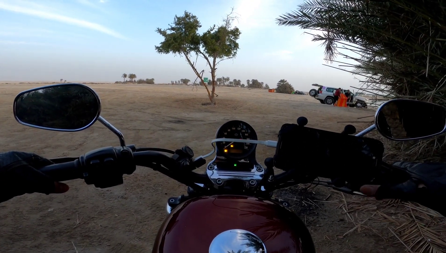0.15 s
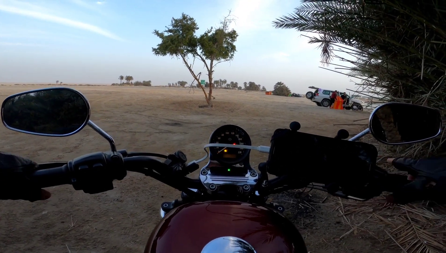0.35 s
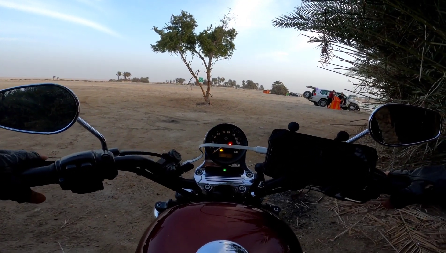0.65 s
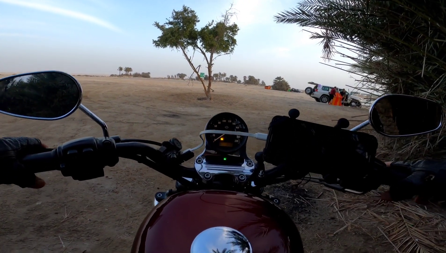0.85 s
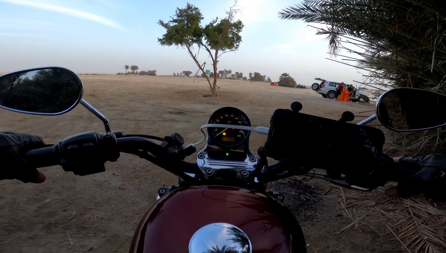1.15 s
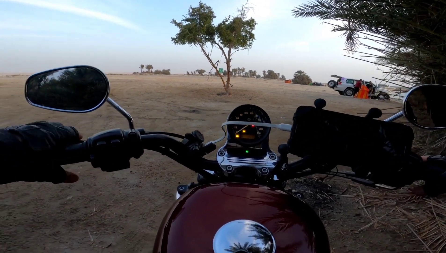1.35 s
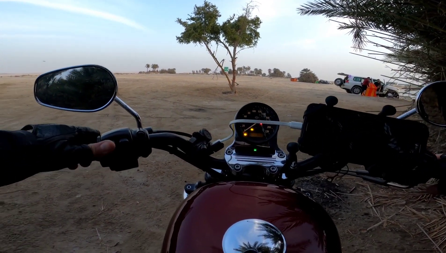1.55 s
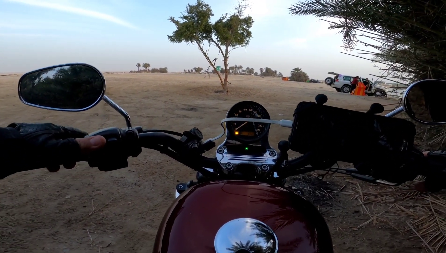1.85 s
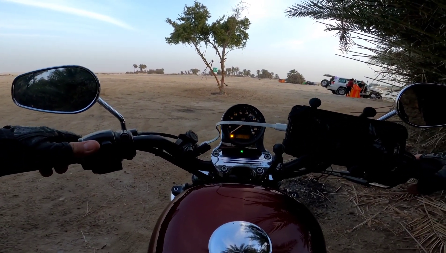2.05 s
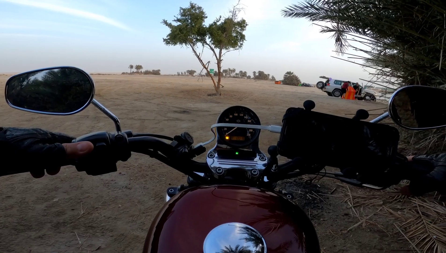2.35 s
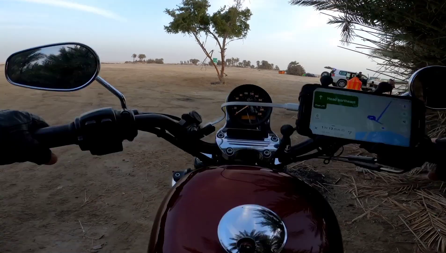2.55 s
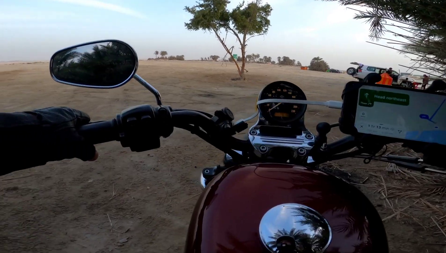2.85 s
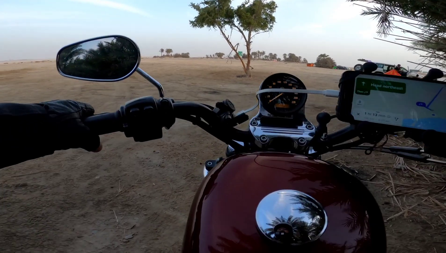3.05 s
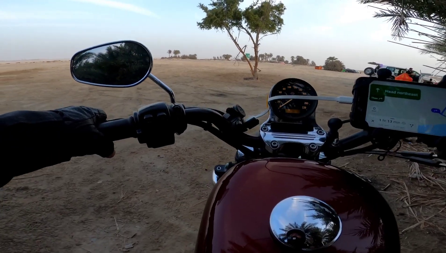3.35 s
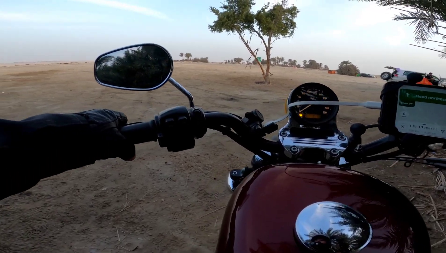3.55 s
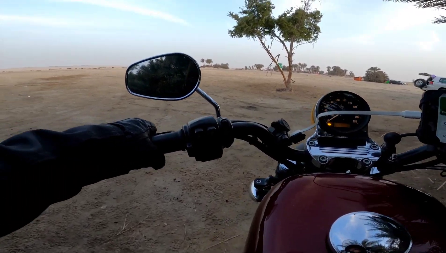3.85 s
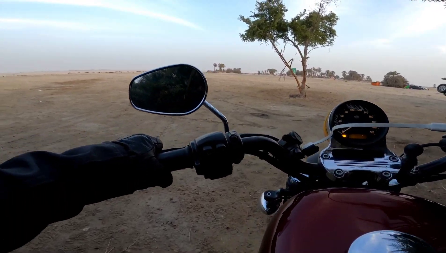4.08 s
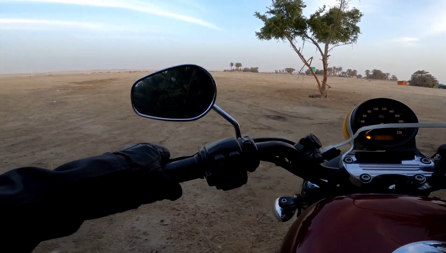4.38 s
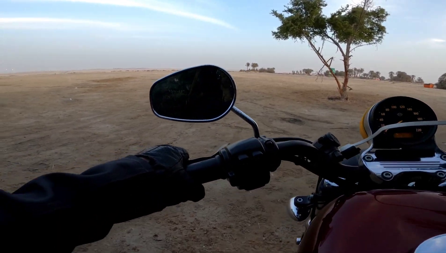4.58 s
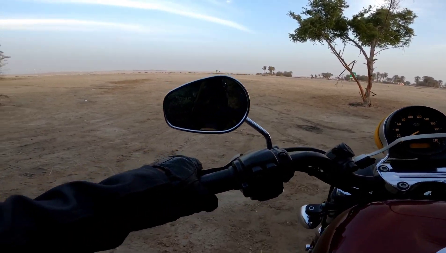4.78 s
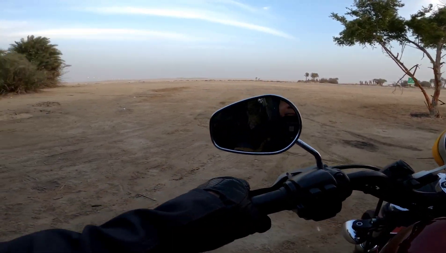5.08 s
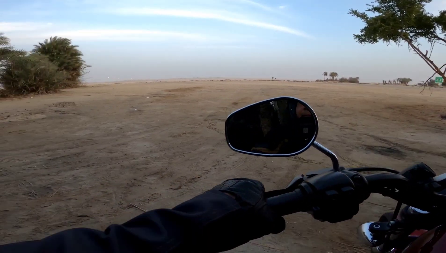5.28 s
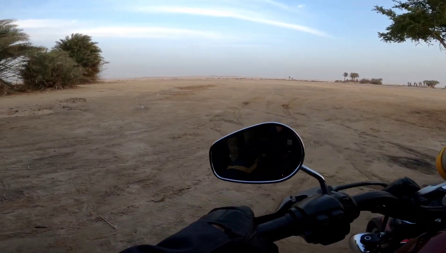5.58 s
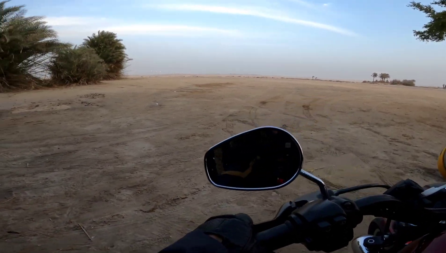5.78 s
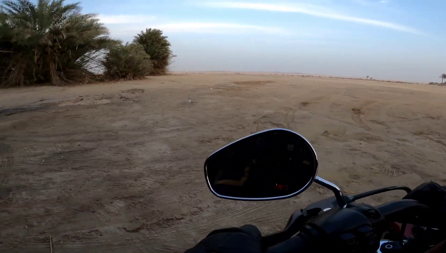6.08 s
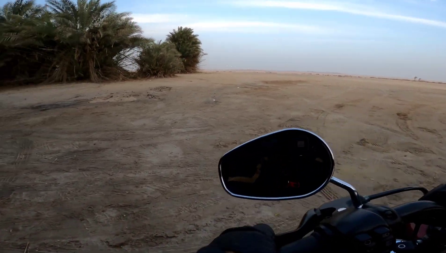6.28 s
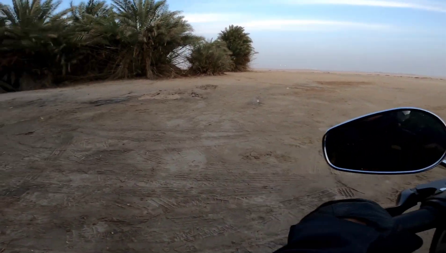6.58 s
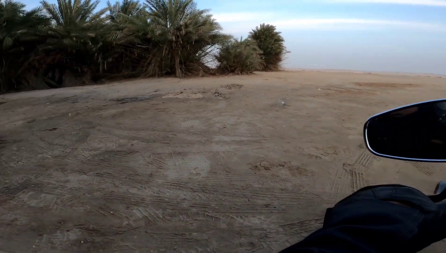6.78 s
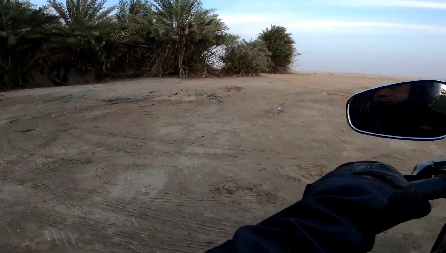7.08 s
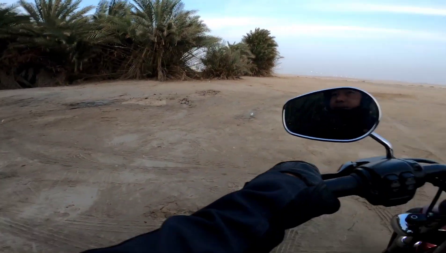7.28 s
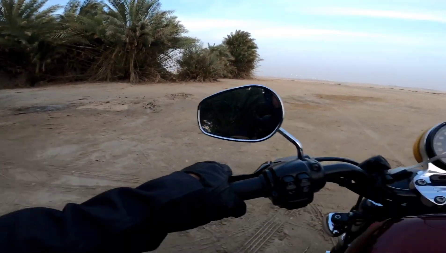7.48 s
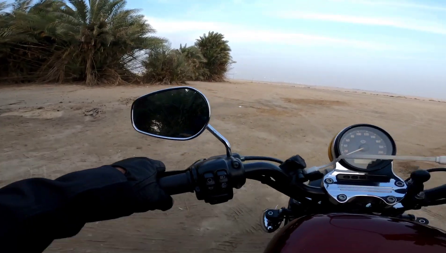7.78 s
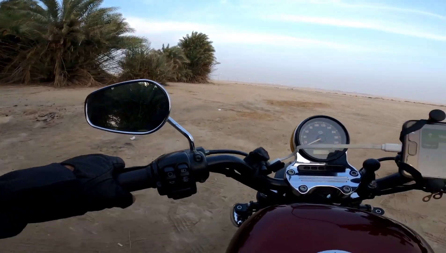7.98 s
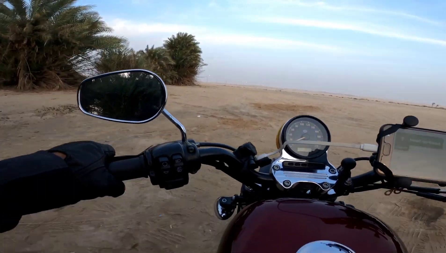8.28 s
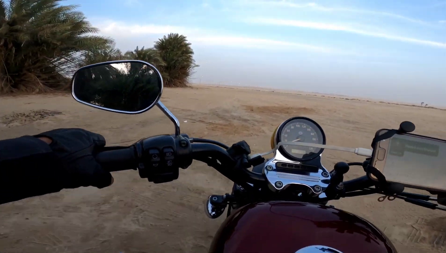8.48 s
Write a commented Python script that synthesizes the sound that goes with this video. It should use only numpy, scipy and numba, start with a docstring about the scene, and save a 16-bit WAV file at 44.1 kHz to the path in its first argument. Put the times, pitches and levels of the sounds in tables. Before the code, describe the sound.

Close, dry and bass-heavy: a big motorcycle engine clanks as it starts, speeds up within half a second and settles into a lumpy fast idle. After a momentary near-silence it runs on restlessly, rising and falling and missing firings. Exhaust thump and bark dominate; intake gulps, chain whirr, bright valve ticking and light casing knocks sit around them. The rider-mounted microphone turns, shifting the metallic colour, and gently rounds the loudest peaks.

```python
"""A big V-twin motorcycle, heard from the saddle: its revs climb from a slow start, with a clank, to a fast idle.
After a brief drop in level it runs on at uneven revs that rise and fall, now and then missing a few beats.
Unevenly spaced firings thump through the silencer and bark in the pipe; the intake gulps and the airbox rings.
The chain whirrs over a rumbling crankcase, valves tick, cooling fins ring and the casing knocks.
One crankshaft drives the periodic parts; engine parts grow louder with the revs and the bark rises as it pulls."""
import sys
import numpy as np
from scipy import signal
from scipy.fft import rfft, irfft
from scipy.io import wavfile
from scipy.ndimage import uniform_filter1d
from numba import njit

SR = 44100
rng = np.random.default_rng(int(sys.argv[2]) if len(sys.argv) > 2 else 0)


def int16_out(signal):
    """Quantize to a 16-bit WAV file."""
    q = np.round(np.clip(np.atleast_2d(signal).T, -1, 1) * 32767)
    wavfile.write(sys.argv[1], SR, q.astype(np.int16))


N = 381024
TIME = np.arange(N) / SR

# where in the two-turn cycle each exhaust valve opens [cycles]
FRONT, REAR = .072, .519
# the level dips here [s] and the engine resumes this much further on in its cycle [cycles]
BREAK_S, BREAK_CYCLES = 2.67, .41
# cooling fins and rocker covers: (centre [Hz], width [Hz], level [dB])
FIN_MODES = [(1936, 20, -10), (2461, 22, 0), (2545, 26, -4), (2650, 42, 2), (2840, 60, -1), (3030, 90, -7),
             (3194, 60, -3), (3400, 120, -12), (3896, 65, -14), (4160, 70, -15)]
# valve train ring: (centre [Hz], width [Hz], level [dB])
VALVE_MODES = [(4610, 210, 1.5), (5280, 970, -5), (7040, 55, 2.5), (7490, 144, 1), (8130, 490, -1),
               (9890, 880, -6.5)]


def undb(db):
    """Decibels to gain."""
    return 10 ** (np.asarray(db) / 20)


def unit(x):
    """Scale to rms 1."""
    return x / np.sqrt(np.mean(x ** 2))


def noise():
    """White noise."""
    return rng.standard_normal(N)


def wander(rate):
    """Random drift in straight lines, rms 1, changing at up to about rate Hz."""
    steps = TIME * 2.2 * rate
    values = rng.standard_normal(16384)
    return unit(np.interp(steps, np.arange(len(values)), values))


def curve(points):
    """Join (time [s], value) points by straight lines."""
    return np.interp(TIME, *np.transpose(points))


def burst(s, db, decay):
    """Level of a contact that starts at once and dies away."""
    return undb(db) * (TIME >= s) * np.exp(-np.abs(TIME - s) / decay)


def band(x, hz, width):
    """One resonance, gain 1 at its centre."""
    return signal.lfilter(*signal.iirpeak(hz, hz / width, fs=SR), x)


def ring(x, modes):
    """A body's resonances; neighbours swing in opposite senses."""
    return sum((-1) ** k * undb(db) * band(x, hz, width) for k, (hz, width, db) in enumerate(modes))


@njit
def sweep(x, hz, width):
    """A resonance whose centre and width [Hz] move, as a state-variable filter."""
    y, b, l = np.empty(len(x)), 0., 0.
    for i in range(len(x)):
        g, k = np.tan(np.pi * hz[i] / SR), width[i] / hz[i]
        v = (b + g * (x[i] + 1e-18 - l)) / (1 + g * (g + k))
        b, l, y[i] = 2 * v - b, l + 2 * g * v, k * v
    return y


def cut(x, hz, kind, order=2):
    """Low-pass or high-pass."""
    return signal.sosfilt(signal.butter(order, hz, kind, fs=SR, output="sos"), x)


def colour(x, points):
    """Shape a spectrum by (frequency [Hz], level [dB]) points."""
    hz, db = np.transpose(points)
    bins = np.maximum(np.fft.rfftfreq(N, 1 / SR), 1)
    return irfft(rfft(x) * undb(np.interp(np.log(bins), np.log(hz), db)), N)


def strokes(cycle, place):
    """Sample numbers at which the engine passes a place in its cycle."""
    return np.flatnonzero(np.diff(np.floor(cycle - place)) > 0)


def stroke_pulses(cycle, lag_cycles, height):
    """One equal pulse per cylinder and cycle, a lag after its exhaust valve opens."""
    pulses = np.zeros(N)
    for place in (FRONT, REAR):
        pulses[strokes(cycle, place + lag_cycles)] = height
    return pulses


def loudness(rpm, idle_db, moving_db, revs_db, pull_db):
    """Gain of an engine part: it follows the revs, and shifts again while the engine gathers speed."""
    # the stated levels hold at cruise; below the low revs they stop falling
    cruise_rpm, low_rpm, full_pull_rpm_per_s = 1830, 1450, 4500
    doublings = np.log2(np.maximum(rpm, low_rpm) / cruise_rpm)
    pull = np.clip(np.gradient(rpm) * SR / full_pull_rpm_per_s, 0, 1)
    pull = uniform_filter1d(pull, size=SR // 8)
    base_db = np.where(TIME < BREAK_S, idle_db, moving_db)
    return undb(base_db + revs_db * doublings + pull_db * pull)


def firings(cycle, rear_db, scatter_db, suck):
    """One pressure pulse per exhaust stroke; in runs of faltering strokes a small backward pulse comes instead."""
    # runs of faltering strokes, each giving a small backward pulse: (start [s], strokes affected [count],
    # spacing [strokes])
    faltering_runs = [(.43, 5, 4), (1.06, 4, 4), (2.01, 4, 4), (4.29, 3, 1), (4.64, 3, 1), (4.9, 3, 1),
                      (5.22, 3, 1), (5.38, 2, 1), (5.57, 1, 1), (6.36, 1, 1), (6.57, 2, 1), (6.96, 1, 1),
                      (7.98, 2, 1), (8.11, 2, 1), (8.47, 1, 1)]
    pulses = np.zeros(N)
    for place, db in ((FRONT, 0), (REAR, rear_db)):
        at = strokes(cycle, place)
        pulses[at] = undb(db + scatter_db * rng.standard_normal(len(at)))
    at = np.flatnonzero(pulses)
    for start, missed, every in faltering_runs:
        first = np.abs(TIME[at] - start).argmin()
        pulses[at[first::every][:missed]] = -suck
    return pulses


def pumping(cycle, lag_cycles, depth):
    """As each piston turns down again it draws gas back, so the rumble carries through a misfire."""
    return stroke_pulses(cycle, lag_cycles, -depth)


def thump(pulses, pace):
    """The silencer rounds each pulse into push, pull and push; hotter gas at higher revs raises its notes."""
    # silencer resonances at mean revs: (centre [Hz], width [Hz], level [dB])
    silencer = [(65.5, 34, -1.5), (137.6, 64.4, 2), (159.8, 45.6, 1), (256.7, 32, -15)]
    puff = cut(pulses, 217, "low")
    heat = pace ** .25
    total = np.zeros(N)
    for k, (hz, width, db) in enumerate(silencer):
        total += (-1) ** k * undb(db) * sweep(puff, hz * heat, width * heat)
    return unit(total / heat)


def bark(pulses, echo_s, echo_db, rush_db):
    """The sharp front of each pulse rings the pipe and returns once from its end; turbulence follows."""
    # higher pipe resonances: (centre [Hz], width [Hz], level [dB])
    pipe_modes = [(219.8, 42, 5), (266.6, 44, 5.5), (379, 22.4, -4), (463, 32, -12), (664, 27, -12.5)]
    echo = np.interp(TIME - echo_s, TIME, pulses)
    fronts = pulses - undb(echo_db) * echo
    # gas rush dies away over 18 ms
    flow = signal.lfilter([1], [1, -np.exp(-1 / (0.018 * SR))], np.abs(pulses))
    rush = flow * noise()
    pipe = ring(unit(fronts) + undb(rush_db) * unit(rush), pipe_modes)
    return unit(cut(cut(pipe, 144, "high", order=3), 700, "low"))


def throttle_blips():
    """Short twists of the throttle raise the bark and the airbox."""
    # twists of the throttle: (time [s], level [dB])
    blips = [(1.12, 3.5), (3.57, 3.5), (8.58, 2)]
    blip_s = 0.11
    return undb(sum(db * np.exp(-((TIME - s) / blip_s) ** 2) for s, db in blips))


def intake(cycle, lag_cycles, length_s):
    """Each piston gulps air a little after its exhaust stroke, whether it fired or not."""
    gulps = stroke_pulses(cycle, lag_cycles, 1)
    bell_time = np.arange(-SR // 20, SR // 20) / SR
    bell = np.exp(-.5 * (bell_time / length_s) ** 2)
    return unit(cut(signal.fftconvolve(gulps, bell, "same"), 30, "high"))


def airbox(cycle, lag_cycles):
    """Each inlet valve snaps open after its exhaust stroke and rings the airbox."""
    # airbox resonances: (centre [Hz], width [Hz], level [dB])
    airbox_modes = [(295, 104, 0), (391, 41, 1.5)]
    snaps = stroke_pulses(cycle, lag_cycles, 1)
    return unit(cut(cut(ring(snaps, airbox_modes), 185, "high", order=3), 640, "low"))


def chain(cycle, rpm, spread, whirr_db, case_hz):
    """Links meet the sprocket 68 times a cycle; uneven links give sidebands, slack smears them into a whirr."""
    links = 68
    orders = np.arange(28, 90)
    place = np.linspace(0, 1, 2048)
    # one cycle of mesh sound, its orders fading either side of the link rate
    waves = np.cos(2 * np.pi * (place[:, None] * orders + rng.random(len(orders))))
    lap = waves @ (1 / np.hypot(1, (orders - links) / spread))
    mesh = np.interp((cycle + .001 * wander(30)) % 1, place, lap)
    hz = links * rpm / 120
    whirr = sweep(noise() * undb(3.0 * wander(100)), hz, 0.94 * hz)
    # the chain case lets little treble out
    return unit(cut(unit(mesh) + undb(whirr_db) * unit(whirr), case_hz, "low", order=8))


def crankcase():
    """Gears and bearings rumble unevenly through the case."""
    # crankcase rumble and gear noise: (frequency [Hz], spectral level [dB])
    case_colour = [(300, -3), (480, 3.5), (560, -6), (660, 1.5), (770, -9), (870, 0), (1050, 0.5),
                   (1230, -5), (1400, -19.5), (1600, -20), (2200, -21.5), (3300, -25), (4500, -34),
                   (6300, -37), (11000, -53.5)]
    rumble = colour(noise() * undb(2.5 * wander(200)), case_colour)
    return unit(cut(rumble, 400, "high", order=3))


def shade_drive(drive, turn):
    """The rider's turned head colours the chain and crankcase."""
    # effect of a full head turn: (frequency [Hz], level [dB])
    head_shadow = [(450, -1), (750, -4), (1080, -2.5), (1280, -15), (1450, 2), (1800, 1.5)]
    return (1 - turn) * drive + turn * colour(drive, head_shadow)


def valve_taps(cycle, scatter_db, clatter_db):
    """Short bursts of metal contact at fixed places in the cycle, over a steady clatter."""
    # valve taps: (place [cycles], decay either side [cycles], level [dB])
    taps = [(.19, 0.037, -4), (.53, 0.1, -7), (0.908, 0.084, -4)]
    force = undb(clatter_db)
    for place, length, db in taps:
        away = (cycle - place + .5) % 1 - .5
        force = force + undb(db + scatter_db * wander(28)) * np.exp(-np.abs(away) / length)
    return force * noise() * undb(2 * wander(720))


def valve_gear(cycle):
    """Taps with little clatter between them ring the valve train brightly."""
    taps = valve_taps(cycle, scatter_db=1.5, clatter_db=-16.0)
    return unit(cut(ring(taps, VALVE_MODES), 3500, "high"))


def fins(taps, sway_db):
    """Each fin rings on its own note, swelling and fading as the rider's head moves."""
    total = np.zeros(N)
    for k, (hz, width, db) in enumerate(FIN_MODES):
        total += (-1) ** k * undb(db + sway_db * wander(2.2)) * band(taps, hz, width)
    return unit(total)


def knocks(blow_db, valve_db):
    """Starter and gearbox knocks, a hard blow and a short rattle, ring the casing, fins and valve gear."""
    # knocks: (time [s], level [dB], decay [s], fins' answer relative to the knock [dB])
    knock_list = [(0.151, -4, 0.01, -14.5), (0.2, -16.5, 0.041, -20), (1.342, -15, 0.004, -22),
                  (2.391, -14.5, 0.0028, -17), (3.232, -21, 0.0046, -18.5), (4.376, -30, 0.0025, -12),
                  (5.884, -24, 0.0028, -20), (6.274, -12.5, 0.0018, -11), (6.78, -18.5, 0.0042, -25),
                  (7.268, -19.5, .003, -22)]
    # the casing under a knock: (centre [Hz], width [Hz], level [dB])
    casing = [(510, 90, 4), (660, 80, 6), (970, 78, 7.5), (1120, 60, 3), (1340, 25, -4), (1880, 63, -16),
              (2580, 170, -9.5), (3050, 67, -11), (6500, 6000, -31)]
    contact = sum(burst(s, db, decay) for s, db, decay, _ in knock_list)
    at_fins = sum(burst(s, db + fin_db, decay) for s, db, decay, fin_db in knock_list)
    rattle = noise()
    total = np.zeros(N)
    for modes, force in ((casing, contact), (FIN_MODES, at_fins), (VALVE_MODES, undb(valve_db) * contact)):
        blow = undb(blow_db) * np.diff(force, prepend=0)
        # a steady rattle would ring each body at level 1
        total += ring(force * rattle + blow, modes) / np.std(ring(rattle, modes))
    return total


def bright_tick():
    """One light, bright tick of decaying noise."""
    # the tick: (time [s], level before filtering [dB], decay [s])
    tick = (5.69, -29, .004)
    return burst(*tick) * cut(cut(noise(), 4000, "high"), 9000, "low")


def scene():
    """One crankshaft times the firings, gulps, chain and valves; the metal rings and knocks join them."""
    # crankshaft speed: (time [s], speed [rpm])
    speed = [(0.0, 825), (0.29, 1847), (0.54, 2119), (0.93, 2121), (1.32, 1919), (2.49, 1725), (2.96, 1564),
             (3.27, 1659), (3.61, 2139), (4.42, 1507), (4.52, 1857), (5.1, 1797), (5.15, 2100), (5.6, 1436),
             (5.88, 1812), (6.03, 1752), (6.29, 2237), (6.67, 1687), (7.06, 1658), (7.24, 1894),
             (7.55, 1860), (7.98, 2079), (8.17, 1626), (8.64, 1642)]
    # the rider looks away, baring the valve gear and shading chain and airbox: (time [s], share of full turn)
    head_turn = [(4.2, 0.25), (6.1, 0.59), (6.75, 0.89), (7.3, .9), (7.8, 0.47)]
    # the fin ring swells and fades as the rider's head moves: (time [s], level [dB])
    fin_swell = [(.3, 0.5), (1.6, -1.5), (3.6, -1), (4.1, -3), (4.6, 1.5), (5.2, -1.5), (6.0, -3.5),
                 (7.5, -3), (7.8, 1), (8.64, -1.5)]
    # part levels: (at idle [dB], on the move [dB], per doubling of revs [dB], added at full pull [dB])
    beat_db = (-11, -15, 2, 0.4)
    bark_db = (-22, -26, 6.5, 3)
    airbox_db = (-28.5, -34, 11.5, -0.5)
    chain_db = (-26, -30, 9.5, 2)
    valve_db = (-49, -51.5, 3, 4)
    fin_db = (-33.5, -35.5, 4.5, -3.5)
    # level changes at a full head turn
    turn_valve_db, turn_airbox_db = 4.5, -5.5

    rpm, turn = curve(speed), curve(head_turn)
    # two turns of the crank make one cycle
    cycle = np.cumsum(rpm / 120) / SR + BREAK_CYCLES * (TIME > BREAK_S)
    throttle = throttle_blips()

    beat_gain = loudness(rpm, *beat_db)
    pulses = firings(cycle, rear_db=0.8, scatter_db=0.93, suck=0.59)
    exhaust = pulses + pumping(cycle, lag_cycles=0.2833, depth=0.24)
    gas = beat_gain * thump(exhaust, rpm / rpm.mean())
    gas += throttle * loudness(rpm, *bark_db) * bark(pulses, echo_s=0.00834, echo_db=-4.0, rush_db=-4)
    gas += beat_gain * undb(-22) * intake(cycle, lag_cycles=.465, length_s=0.0053)
    airbox_gain = throttle * loudness(rpm, *airbox_db) * undb(turn_airbox_db * turn)
    gas += airbox_gain * airbox(cycle, lag_cycles=.325)

    drive = chain(cycle, rpm, spread=6.1, whirr_db=-2.5, case_hz=1073) + undb(3.0) * crankcase()
    metal = loudness(rpm, *chain_db) * shade_drive(drive, turn)
    valve_gain = loudness(rpm, *valve_db) * undb(turn_valve_db * turn ** 2)
    metal += valve_gain * valve_gear(cycle)
    fin_gain = loudness(rpm, *fin_db) * undb(curve(fin_swell))
    metal += fin_gain * fins(valve_taps(cycle, scatter_db=0.5, clatter_db=-1.5), sway_db=2.5)
    metal += knocks(blow_db=15, valve_db=-45) + bright_tick()

    # everything drops to a twentieth for about 12 ms
    gap = 1 - .95 * np.exp(-((TIME - BREAK_S - .007) / .006) ** 4)
    return ((gas + metal) * gap)[None]


def record(dry):
    """The microphone rounds the loudest peaks and loses the top octave."""
    top_hz = 11200
    rounded = dry / (1 + (dry / .97) ** 8) ** (1 / 8)
    return signal.sosfilt(signal.ellip(6, .3, 70, top_hz, fs=SR, output="sos"), rounded)


dry = scene()
out = record(dry)
int16_out(out)
```